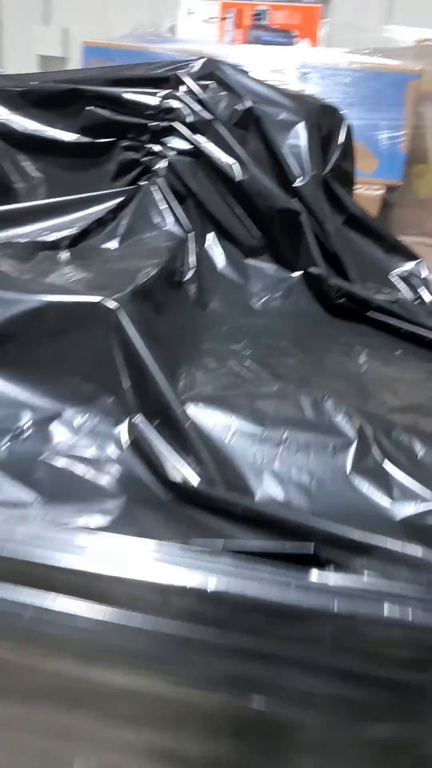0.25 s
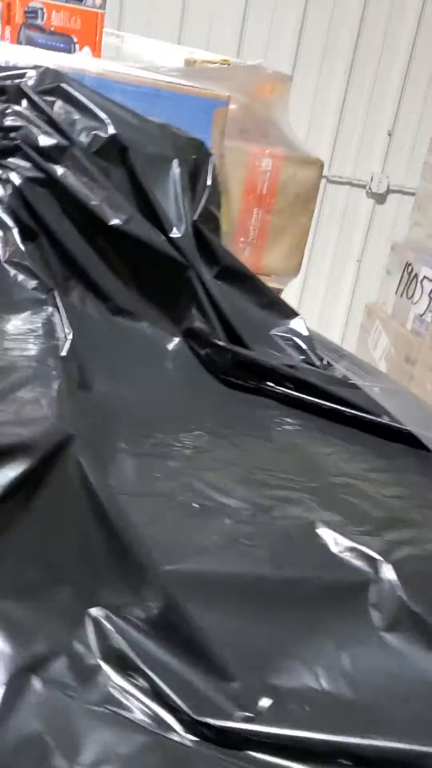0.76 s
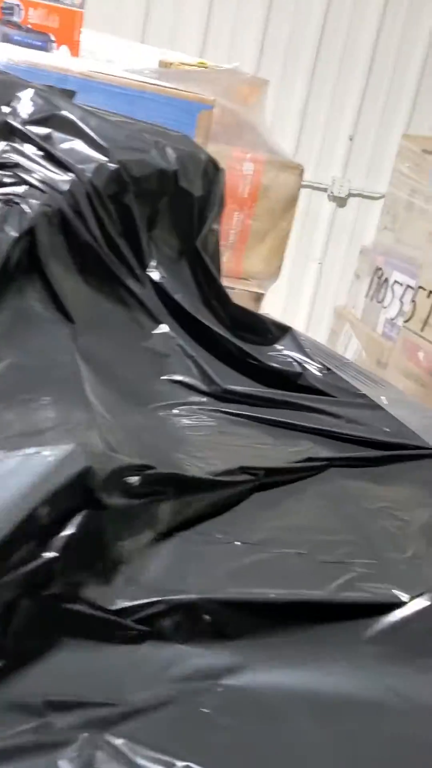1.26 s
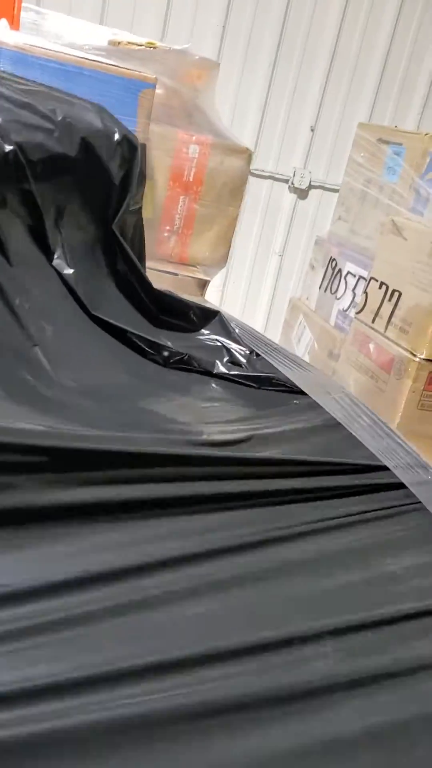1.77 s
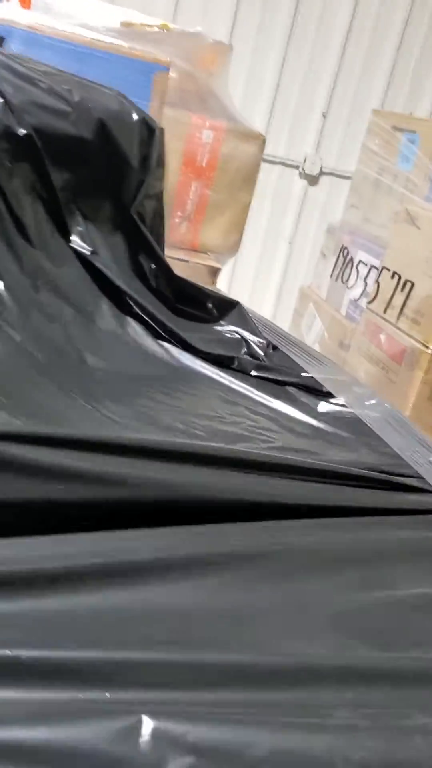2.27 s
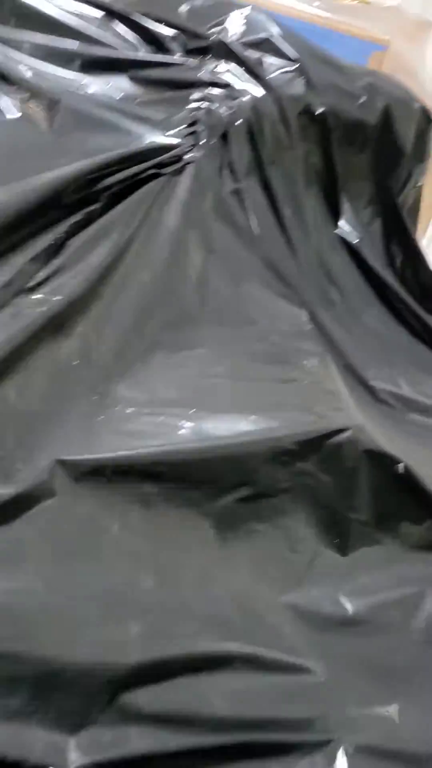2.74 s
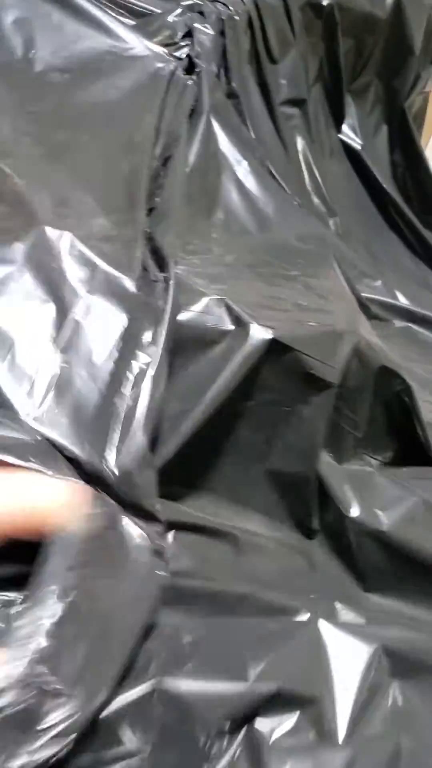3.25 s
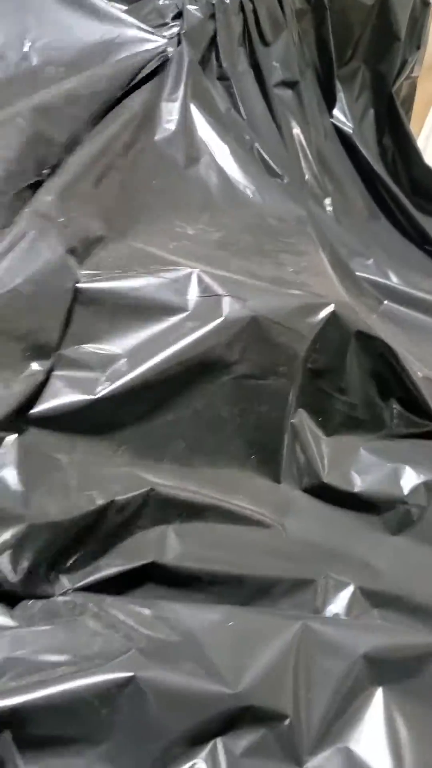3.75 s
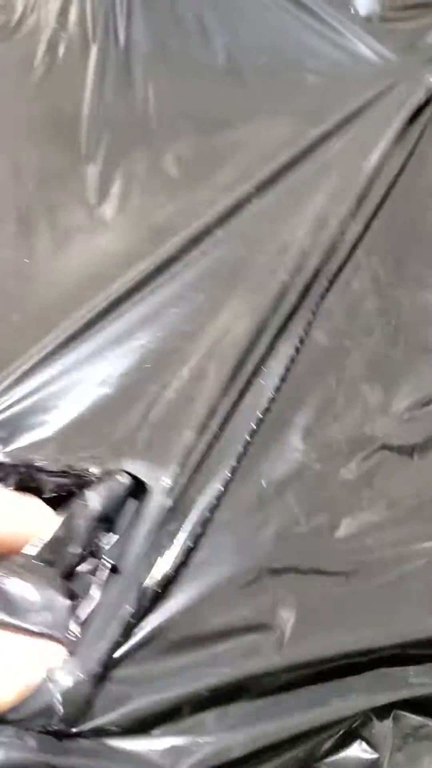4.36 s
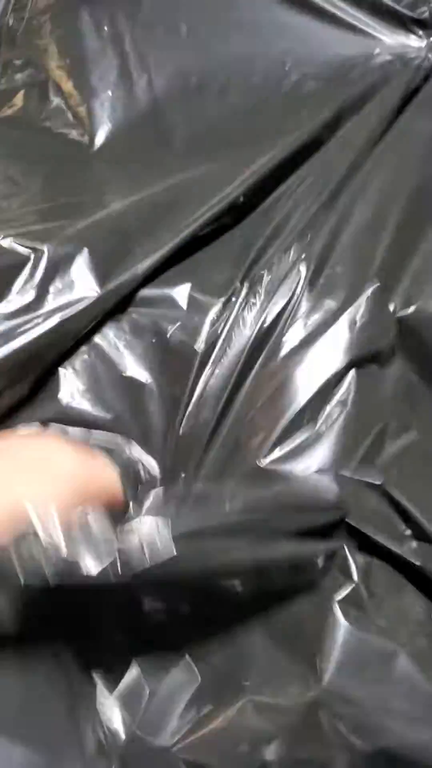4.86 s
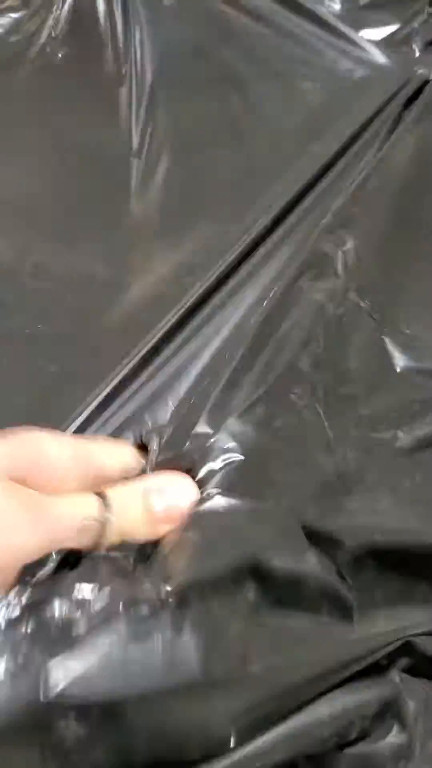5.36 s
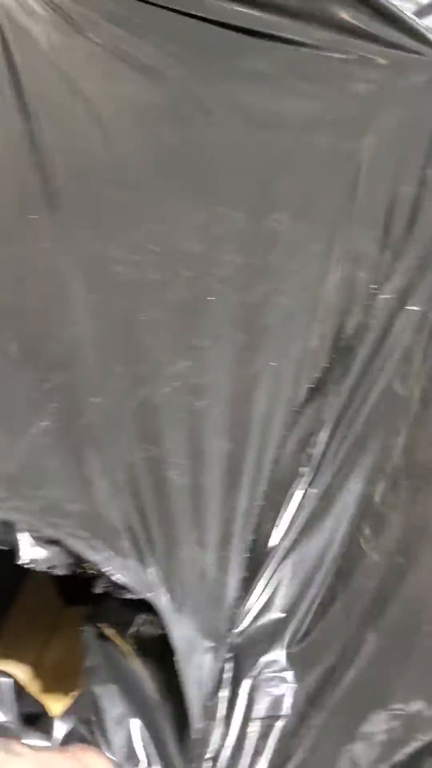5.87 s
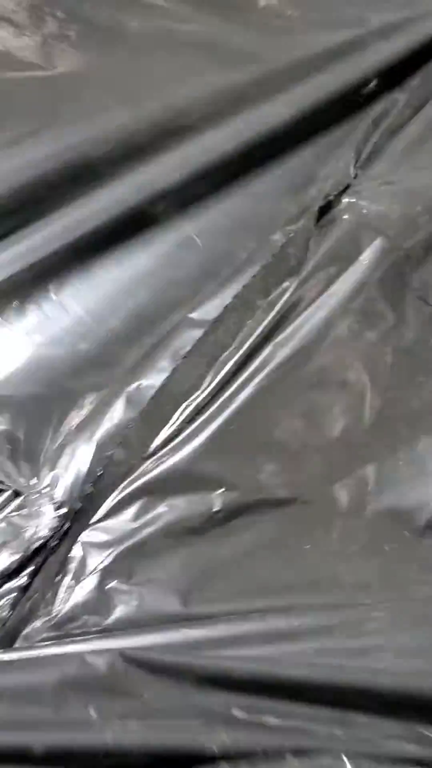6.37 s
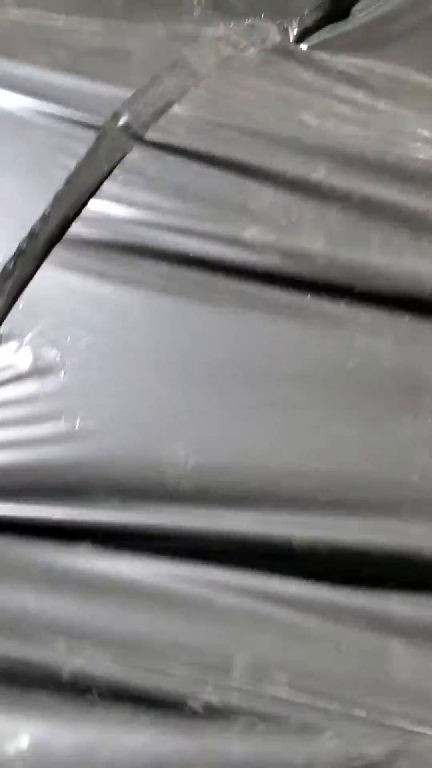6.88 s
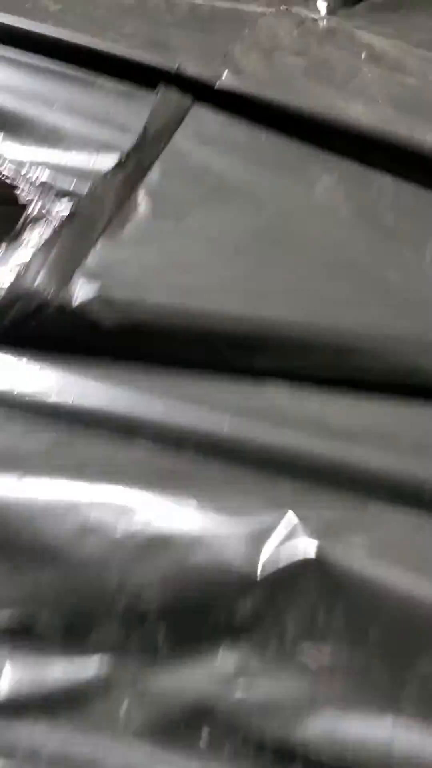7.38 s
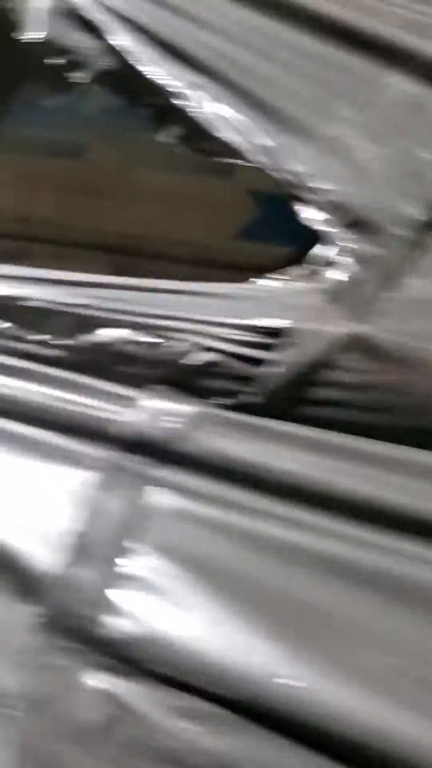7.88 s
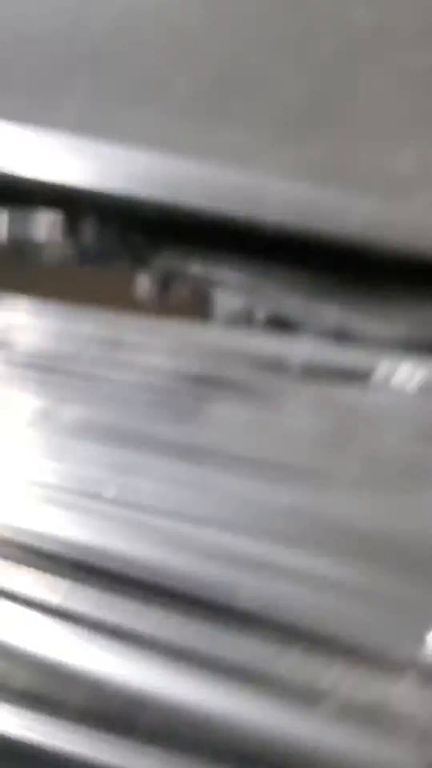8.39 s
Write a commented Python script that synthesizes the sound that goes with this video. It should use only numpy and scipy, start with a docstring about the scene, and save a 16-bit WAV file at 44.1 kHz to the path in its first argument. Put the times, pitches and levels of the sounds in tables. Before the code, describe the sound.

After a faint half second of ventilation rumble, a big plastic sheet crinkles, rustles, flaps and snaps under repeated tugs, close up.

```python
"""Faint rustles over a low ventilation rumble come first; then black plastic sheeting is pulled over a pallet,
an arm's length from a phone in a large warehouse. Creases buckle in swarms of tiny noise clicks, single folds
snap in short noise bursts, slack panels flap as falling chirps and billow as low noise, and tugs, one of them
hard, crack the sheet taut in dying avalanches of clicks. Noise impulse responses add a faint hall tail."""
import sys
import numpy as np
from scipy import signal
from scipy.fft import rfft, irfft
from scipy.io import wavfile
from scipy.ndimage import uniform_filter1d

SR = 44100
rng = np.random.default_rng(int(sys.argv[2]) if len(sys.argv) > 2 else 0)


def log_audio(samples):
    """Write samples as a 16-bit WAV file to the path given in sys.argv[1]."""
    # one column per channel
    frames = np.atleast_2d(samples).T
    # limit to full scale, then quantise
    limited = np.clip(frames, -1, 1)
    pcm = np.round(limited * 32767).astype(np.int16)
    wavfile.write(sys.argv[1], SR, pcm)


N = 380353
TIME, FREQ = np.arange(N) / SR, np.fft.rfftfreq(2 * N, 1 / SR)


def undb(db):
    """Decibels to gain."""
    return 10 ** (np.asarray(db) / 20)


def unit(x):
    """Scale to rms 1."""
    return x / np.sqrt(np.mean(x ** 2))


def curve(table):
    """Interpolate (s, value) rows to one value a sample."""
    s, value = np.transpose(table)
    return np.interp(TIME, s, value)


def spectrum(points):
    """Gain at every frequency from (Hz, dB) points."""
    hz, db = np.transpose(points)
    return undb(np.interp(np.log(FREQ + 1), np.log(hz), db))


def shape(x, gain):
    """Causal (minimum-phase) filter with the given gain at every frequency."""
    cepstrum = irfft(np.log(gain + 1e-6))
    # fold the cepstrum onto positive time
    cepstrum[1:N] *= 2
    cepstrum[N + 1:] = 0
    response = np.exp(rfft(cepstrum))
    return irfft(rfft(x, 2 * N) * response)[..., :N]


def resonance(hz, width_hz):
    """Complex response of one resonance, 1 at its centre."""
    damping = 1j * FREQ * width_hz
    return damping / (hz ** 2 - FREQ ** 2 + damping)


def split(x, hz):
    """The parts below and above a frequency, each through two cascaded Butterworth filters."""
    parts = []
    for kind in ("low", "high"):
        sos = signal.butter(2, hz, kind, fs=SR, output="sos")
        parts.append(signal.sosfilt(np.vstack([sos, sos]), x))
    return parts


def pan(left_minus_right_db):
    """Left and right gains for a level difference."""
    return undb(np.vstack([left_minus_right_db, -left_minus_right_db]) / 2)


def walk(rate_per_s):
    """Random levels, rate_per_s of them a second, joined by ramps; rms 1."""
    hold = int(SR / rate_per_s)
    levels = rng.standard_normal(N // hold + 1)
    steps = np.repeat(levels, hold)[:N]
    return unit(uniform_filter1d(steps, hold))


def burst(rise_s, decay_s, size):
    """Two unrelated noises under a quick rise and an exponential fall."""
    t = TIME[:size]
    envelope = (1 - np.exp(-t / rise_s)) * np.exp(-t / decay_s)
    return rng.standard_normal((2, size)) * envelope / envelope.max()


def add(out, s, sound):
    """Mix a sound in at a time."""
    start = max(int(s * SR), 0)
    out[..., start:start + sound.shape[-1]] += sound[..., :max(N - start, 0)]


def swarm(rate_per_s, spread_db, ring_s, tint_db, size=256):
    """Creases buckle at random; each click has its own strength, smear, tint and direction."""
    starts = np.flatnonzero(rng.random(N) < rate_per_s / SR)
    count = len(starts)
    length, side, lag = rng.standard_normal((3, count, 1, 1))
    tint = rng.standard_normal((count, 1, 4))
    ears = np.array([[1], [-1]])
    # most clicks are weak, a few are strong
    strength = undb(spread_db * np.minimum(rng.standard_exponential((count, 1, 1)), 4))
    direction = undb(1.7 * side * ears)

    late_s = .00015 * np.maximum(ears * lag, 0)  # one ear hears it later
    age = np.maximum(TIME[:size] - late_s, 0) / (ring_s * np.exp(.4 * length))
    clicks = rng.standard_normal((count, 2, size)) * (1 - np.exp(-4 * age)) * np.exp(-age)

    # each click has its own random tint across four regions
    bins_hz = np.fft.rfftfreq(size, 1 / SR)
    regions = np.array([np.interp(bins_hz, [900, 2800, 6000, 13000], row) for row in np.eye(4)])
    clicks = irfft(rfft(clicks) * undb(tint_db * tint @ regions)) * strength * direction

    places = (starts[:, None] + np.arange(size)).ravel()
    return unit(np.array([np.bincount(places, port.ravel(), N)[:N] for port in clicks.swapaxes(0, 1)]))


def microphones(pair):
    """Two ports a phone's length apart: alike in the bass, unrelated in the treble."""
    apart = np.clip(np.hypot(.24, (FREQ / 900) ** 2), 0, 1)  # side to mid ratio
    mid = shape(pair[0], 1 / np.sqrt(1 + apart ** 2))
    side = shape(pair[1], apart / np.sqrt(1 + apart ** 2))
    return np.array([mid + side, mid - side])


# Colour of the hall's ventilation. Each row: frequency in Hz, relative density in dB per Hz.
VENTILATION_COLOUR = [(15, -30), (25, -7), (77, -4), (118, -21.5), (271, -30.5), (1500, -60.5), (1760, -58),
                      (3540, -46.5), (6370, -46.5), (15000, -53.5)]
VENTILATION_RMS_DB = -52


def ventilation():
    """Steady low air rumble, strongest between about 25 and 80 Hz."""
    rumble = shape(rng.standard_normal((2, N)), spectrum(VENTILATION_COLOUR))
    return unit(microphones(rumble)) * undb(VENTILATION_RMS_DB)


def warehouse(x, near_db, far_db, t60_s):
    """Quick reflections off stacked boxes, then the long dull tail of the hall."""
    near = burst(0.00152, 0.0093, size=6000)
    low, high = split(burst(0.022, t60_s / np.log(1000), size=70000), 5140)
    far = low + high * np.exp(-TIME[:low.shape[1]] / 0.27)  # treble dies sooner
    echoes = np.zeros((2, N))
    for db, response in [(near_db, near), (far_db, far)]:
        response = response / np.linalg.norm(response[0])
        echoes += undb(db) * signal.oaconvolve(x, response, axes=1)[:, :N]
    return echoes


SETTLE_FROM_S, SETTLE_PER_S, SETTLE_DB = .57, 230, -46.5


def settling():
    """Once disturbed, creases keep relaxing by themselves: faint ticks, heard in the lulls between strokes."""
    ticks = swarm(SETTLE_PER_S, spread_db=3.5, ring_s=0.00058, tint_db=-0.5)
    low, high = split(ticks, 8340)
    return (low + undb(-7) * high) * undb(SETTLE_DB) * (TIME > SETTLE_FROM_S)


# Pulls and grabs of the hand. Each row: start in s, attack in s, hold in s, release in s, crinkle level in dB,
# and relative to it fine crackle in dB, panel flutter in dB, billowing air in dB; all before the source gains.
STROKES = [(0, .02, 0.0496, 0.0311, -66, 9.5, -1, 5), (0.181, .06, 0.0428, 0.0265, -67, 8.5, -1, -0.5),
           (.44, 0.0186, 0.01005, 0.01917, -55, -1.5, -20, -14.5),
           (.5, 0.02108, 0.0185, .05, -59, 2.5, -3.5, -13.5),
           (.55, 0.0151, 0.0246, 0.024, -42, -11.5, -6.5, -17),
           (.54, 0.072, 0.201, 0.0393, -35, 0, -8.5, -13.5),
           (.73, 0.1366, 0.3532, 0.067, -32, 1.5, -9.5, -14), (1.049, 0.361, .01, 0.198, -32, 2, -8.5, -17),
           (1.481, .09, 0.497, 0.0609, -31.5, -0.5, -7.5, -10.5),
           (2.029, 0.2177, 0.0822, 0.174, -39, 1.5, -6.5, -9.5),
           (2.37, 0.1124, 0.093, 0.069, -37, 3, -6, -11), (2.571, 0.49, 0.0067, 0.098, -30, 1, -7, -19.5),
           (3.07, .32, .02, .15, -28.5, -1, -7.5, -12.5),
           (3.52, 0.1754, 0.0202, 0.01192, -35, 1.5, -8.5, -9.5),
           (3.681, 0.1327, 0.0822, 0.0151, -31, -1, -9, -16),
           (3.78, 0.2094, 0.167, 0.1388, -29, 1, -8.5, -13),
           (4.16, 0.077, 0.3773, 0.0612, -34, -0.5, -11, -14.5),
           (4.42, 0.282, 0.2526, .12, -32, -2.5, -11, -14), (5.0, .32, .25, 0.1068, -26.5, -1.5, -11, -14),
           (5.59, 0.0972, .06, 0.155, -30, -1.5, -9, -16), (5.81, .23, 0.0087, 0.1173, -35, 3, -7.5, -11),
           (6.08, .16, 0.1702, .14, -32, -1.5, -10.5, -13),
           (6.38, .26, 0.00964, 0.112, -32.5, 1.5, -10, -9.5),
           (6.829, .085, .045, .03, -37, -1.5, -7, -5.5), (7.09, .07, 0.0742, 0.0795, -33, 0.5, -7, -5.5),
           (7.24, 0.1012, 0.009967, .13, -33, -1.5, -8, -13),
           (7.43, 0.0875, 0.0303, 0.02054, -38, -6.5, -7, -7.5),
           (7.682, 0.0439, 0.0583, 0.041, -43, -4.5, -8.5, -9.5),
           (7.82, 0.1273, 0.0687, .17, -33, -0.5, -6.5, -8.5),
           (7.971, 0.2788, 0.037, 0.14, -29, 1.5, -7.5, -7), (8.401, .05, 0.15, 0.0715, -36, 0.5, -7, -13)]
REST_DB = -92.5  # the sheet lying still
JERK_DB, JERK_PER_S = 1.114, 17


def handling():
    """Strokes gather speed, hold and die away, catching and slipping; gives four control levels in dB."""
    power = np.full((4, N), undb(REST_DB) ** 2)
    for s, attack_s, hold_s, release_s, db, fine_db, flutter_db, billow_db in STROKES:
        age = TIME - s
        rise = np.clip(age / attack_s, 0, 1) ** 2
        fall = np.exp(-np.maximum(age - attack_s - hold_s, 0) / release_s)
        levels_db = [[db], [db + fine_db], [db + flutter_db], [db + billow_db]]
        power += (undb(levels_db) * (rise * fall + 1e-9)) ** 2
    creases, ticks, panels, air = 10 * np.log10(power)
    jerk = JERK_DB * walk(JERK_PER_S)
    # fine crackle stays relative to the creases
    return creases + jerk, ticks - creases, panels + jerk, air + jerk


# Colours of panel flutter and billowing air. Each row: frequency in Hz, relative density in dB per Hz.
FLUTTER_COLOUR = [(70, -28.5), (130, -4), (220, -1), (350, -3), (440, 0), (620, -5), (1000, -17),
                  (2500, -34)]
BILLOW_COLOUR = [(15, -34.5), (30, -12), (50, -4.5), (75, 2.5), (110, -1.5), (170, -9.5), (400, -41.5)]
FLUTTER_GAIN_DB, BILLOW_GAIN_DB = 1.02, 1.39
BILLOW_SURGE_DB, BILLOW_SURGE_PER_S = 1.5, 9


def body(flutter_db, billow_db):
    """Wide panels patter softly as the sheet moves, and shove air at the microphones."""
    patter = swarm(700, spread_db=2.2, ring_s=.001, tint_db=1)
    flutter = unit(shape(patter, spectrum(FLUTTER_COLOUR)))
    billow = unit(shape(rng.standard_normal((2, N)), spectrum(BILLOW_COLOUR)))
    surge = undb(BILLOW_SURGE_DB * walk(BILLOW_SURGE_PER_S))
    return flutter * undb(flutter_db + FLUTTER_GAIN_DB) + billow * undb(billow_db + BILLOW_GAIN_DB) * surge


# Slack panels that flap.
# Each row: start in s, swing level in dB, nominal swing rate in Hz, after-flutter in dB re swing before its gain.
FLAPS = [(1.041, -24.5, 111.1, 4), (1.7363, -7, 1099, -27), (1.7656, -19.5, 400.4, -3),
         (1.7762, -16.5, 330.1, -7), (1.8067, -10.5, 445, -8.5), (1.9879, -9.5, 1203, -25),
         (1.995, -21, 71.5, -9), (2.027, -19.5, 70.8, -10.5), (2.046, -25, 70, -15),
         (2.448, -30.5, 129.8, -6.5), (3.3359, -15, 380.8, -15.5), (3.414, -10, 230.7, -17.5),
         (3.434, -19, 85.22, -14), (3.6, -25.5, 220, -8), (4.326, -19.5, 277, -15),
         (4.7772, -10.5, 379.9, -9.5), (4.7956, -14, 361, -7.5), (4.806, -22.5, 110, -7.5),
         (5.675, -23.5, 90.11, 0), (6.035, -21.5, 261.6, -4), (6.451, -22, 379.5, -12),
         (6.465, -11.5, 425, -13), (6.49, -18, 221.2, -7.5), (6.52, -27.5, 199, 4.5),
         (6.5579, -14.5, 250.5, -2.5), (7.165, -11, 414, -4), (7.173, -17.5, 74.8, -24),
         (7.195, -18, 100, -4), (8.286, -22, 120.1, -8.5)]
# Ring of a stretched panel. Each row: centre in Hz, width in Hz, relative level in dB.
PANEL_MODES = [(119, 41, -3), (213, 31.5, -2), (313.6, 110, -7.5), (434.6, 67, -0.5), (597, 340, -14.5),
               (1000, 620, -11)]
SHAKE_GAIN_DB = 18.0


def flaps():
    """A panel sucks air and pushes it back, fast waves first, then flutters on in its broad resonances."""
    swing, shake = np.zeros((2, N)), np.zeros((2, N))
    for s, db, hz, flutter_db in FLAPS:
        cycles = TIME[:4000] * hz
        wave = -np.sin(2 * np.pi * cycles ** 0.64) * np.exp(-(cycles / 0.886) ** 4)
        add(swing[0], s, undb(db) * wave)  # middle only
        # slow, wide panels cannot shake the higher resonances
        tremor, _ = split(burst(0.00143, 0.01567, size=6000), np.clip(2.57 * hz, 50, 5000))
        add(shake, s, undb(db + flutter_db) * tremor)
    ring_power = sum(undb(mode_db) ** 2 * abs(resonance(hz, width_hz)) ** 2
                     for hz, width_hz, mode_db in PANEL_MODES)
    return swing + undb(SHAKE_GAIN_DB) * shape(shake, ring_power ** .5)


# Tugs that pull the sheet taut, so that many creases give at once. Each row: start in s, level in dB, decay in s.
TUGS = [(1.806, -18.5, 0.0082), (3.396, -20.5, 0.016), (7.1632, -11.5, 0.027), (7.522, -24.5, 0.01464)]


def tugs():
    """An avalanche of bright clicks that dies away as the sheet comes to rest."""
    force = np.zeros(N)
    t = TIME[:SR]
    for s, db, decay_s in TUGS:
        add(force, s, undb(db) * (1 - np.exp(-t / 0.00073)) * np.exp(-t / decay_s))
    clicks = swarm(2200, spread_db=1.8, ring_s=.0005, tint_db=2.5, size=128)
    low, high = split(force * clicks, 6300)
    return low + undb(3.5) * high


# Single folds that snap. Each row: start in s, level in dB before SNAP_GAIN_DB, low band in dB re mid,
# treble band in dB re mid, left minus right in dB.
SNAPS = [(0.4625, -34, -22, -20, 15), (0.5143, -35, -13.5, -5, -6.5), (0.5679, -35, 4.5, -0.5, -2),
         (1.2748, -16.5, -3, 4, 1.5), (1.4162, -15, -13, 13.5, -6.5), (1.4234, -6, -14.5, 7, -3),
         (1.7358, -2, -2, -12, -3), (1.7779, -17, 12, -6.5, 0.5), (1.9874, -3, 6, 0, -0.5),
         (2.0192, -10.5, 10.5, 6, -3.5), (2.591, -18, -7.5, 1, -2), (2.8965, -20, -21.5, -1, 4),
         (3.0056, -2.5, -12, -6, -4.5), (3.3112, -16, -16, 8.5, 6), (3.5934, -15.5, 7, -2, 6),
         (4.3278, -5.5, -2.5, -1, -1.5), (4.9671, -18.5, -11, -6.5, -5), (5.2708, -15.5, -5.5, -14, -1),
         (5.5632, -5.5, 5.5, -5, 13.5), (6.047, -10.5, 1, -13, -0.5), (6.8414, -28, -16.5, 2.5, 4.5),
         (6.9233, -17.5, -20, 7, -1), (6.9657, -19.5, -13.5, 7.5, 0), (7.0327, -19, -16.5, -3.5, 0),
         (7.108, -32.5, 0, 1, 1), (7.1684, 1.5, -19, -10, 1), (7.2534, -17, -20, 10.5, -1),
         (7.3364, -16.5, -17.5, 3.5, -3.5), (7.3837, -11, -24, 7, 0), (7.5266, -10.5, -23.5, -8, 5.5),
         (7.654, -21, -15.5, -3.5, 0), (7.8436, -28, -0.5, 2.5, 2.5), (7.9493, -13.5, -18, 10, -0.5),
         (8.0224, -7, -24, 1.5, -0.5), (8.1284, -17, -17.5, 9, 0), (8.3789, -10.5, -0.5, 0, -5)]
SNAP_GAIN_DB = -1


def snaps():
    """A big fold creaks for a millisecond and flips through with a sharp crack; its neighbours rustle after it."""
    out = np.zeros((2, N))
    for s, db, low_db, treble_db, pan_db in SNAPS:
        creak = undb(-4) * burst(.0004, .0008, size=2000)
        rustle = undb(-22) * burst(.001, .005, size=2000)
        sound = creak + rustle
        sound[:, 35:] += burst(.00005, .0002, size=1965)  # the crack, 0.8 ms late
        lower, high = split(sound, 6220)
        low, mid = split(lower, 2160)
        coloured = low * undb(low_db) + mid + high * undb(treble_db)
        add(out, s, coloured * undb(db + SNAP_GAIN_DB) * pan(pan_db))
    return out


CRINKLE_GAIN_DB = 4.5


def crinkle(level_db, fine_db):
    """Faster handling buckles more creases a second; sharp ones tick on top, film hisses on film beneath."""
    busy = undb(.55 * (level_db + 35))
    buckling = np.clip((level_db + 62) / 10, 0, 1)  # gentle handling only hisses
    # dividing by sqrt(busy) keeps the rate from changing the level
    creases = unit(swarm(1600 * busy, spread_db=3.3, ring_s=.0007, tint_db=3.5) / np.sqrt(busy))
    sharp = unit(swarm(450 * busy, spread_db=4.0, ring_s=.00013, tint_db=2.5) / np.sqrt(busy))
    _, ticks = split(sharp, 3800)
    slide, _ = split(rng.standard_normal((2, N)), 15630)
    grain = buckling * (creases + undb(-3.5) * ticks) + undb(-4.5) * slide
    low, high = split(grain * undb(0.636 * walk(90)), 5200)
    return (low + high * undb(fine_db)) * undb(level_db + CRINKLE_GAIN_DB)


def glance(x, lag_s, sway):
    """The echo off the sheet itself; its path drifts at random as the hand moves, so the colour shifts."""
    return np.array([np.interp(TIME - lag_s * np.exp(sway * walk(1.5)), TIME, port) for port in x])


# A pocket gathered in the hand. Each row: time in s, resonance gain in dB.
POCKET = [(0, -37), (2.8, -7), (3.9, -10.5), (4.6, -1), (5.1, 0), (5.55, -3.5), (5.8, -16.5), (6.2, -7.5),
          (7.2, -2), (8.6, -20.5)]


def pocket(film):
    """The gathered pocket rings hollow: a resonant peak with a dip just below it."""
    hollow = resonance(1960, 255) - 0.816 * resonance(1546, 315)
    ring = irfft(rfft(film, 2 * N) * hollow)[:, :N]
    return undb(curve(POCKET)) * ring


# Side on which the hand works. Each row: time in s, left minus right in dB.
HAND_SIDE = [(0.6, -0.5), (2.3, -2.11), (3.3, 0.5), (4.0, -2.15), (4.9, 1.5), (5.5, -1.81), (7.2, 0),
             (8.6, -1)]
# Colour of the crinkling. Each row: frequency in Hz, filter gain in dB.
FILM_COLOUR = [(250, -29), (600, -3.5), (1000, -3.5), (2000, -0.5), (3200, 2.5), (5000, -0.5), (9000, -2),
               (16000, -10)]


def film_sound(level_db, fine_db):
    """All creases sound through the film's colour, its own echo and the hollow pocket."""
    creases = crinkle(level_db, fine_db) * pan(curve(HAND_SIDE))
    film = shape(creases + settling() + snaps() + tugs(), spectrum(FILM_COLOUR))
    film = film + .28 * glance(film, lag_s=.0011, sway=.2)
    return film + pocket(film)


def scene():
    """The sheet, barely stirring at first, is handled close by in the rumbling hall."""
    level_db, fine_db, flutter_db, billow_db = handling()
    panels = microphones(body(flutter_db, billow_db) + flaps())
    sheet = film_sound(level_db, fine_db) + panels
    return ventilation() + warehouse(sheet, near_db=-13.0, far_db=-24.5, t60_s=1.0) + sheet


# Colours of the two microphone ports. Each row: frequency in Hz, filter gain in dB.
LEFT_PORT = [(100, -1.5), (800, -1.5), (1400, 4.5), (2400, -2), (5000, 0), (6700, 3), (7400, -5.5),
             (8200, -5.5), (10500, 0.5), (12500, 8.5), (16000, 2.5)]
RIGHT_PORT = [(100, 0), (800, 1), (1400, 4), (2400, -0.5), (4000, -1.5), (5900, -8.5), (7000, -5),
              (8200, -6), (12000, 1.5), (15300, 5)]
RUMBLE_CUT_HZ, TOP_HZ = 36, 16000


def record(dry):
    """Each port has its own colour; the phone sheds the deepest rumble, rounds the peaks and cuts the top."""
    heard = np.array([shape(dry[0], spectrum(LEFT_PORT)), shape(dry[1], spectrum(RIGHT_PORT))])
    rumble_cut = signal.butter(3, RUMBLE_CUT_HZ, "high", fs=SR, output="sos")
    rounded = np.tanh(signal.sosfilt(rumble_cut, heard))
    top_cut = signal.ellip(10, .2, 80, TOP_HZ, fs=SR, output="sos")
    return signal.sosfilt(top_cut, rounded)


dry = scene()
out = record(dry)
log_audio(out)
```